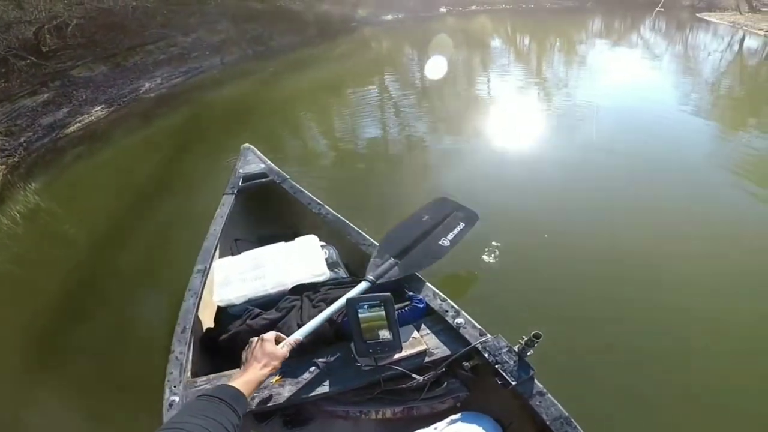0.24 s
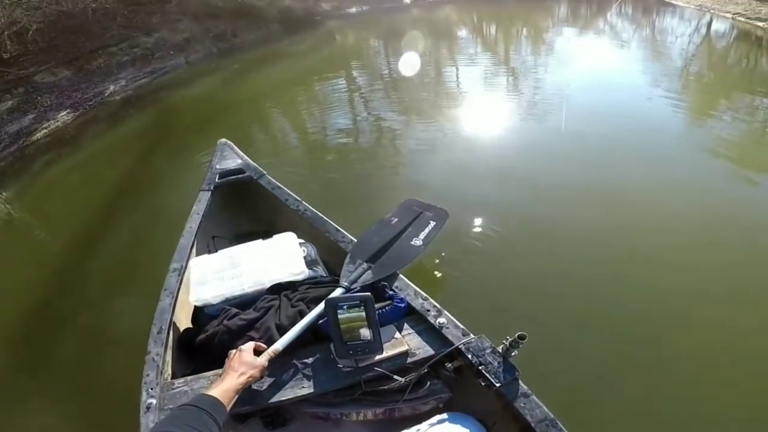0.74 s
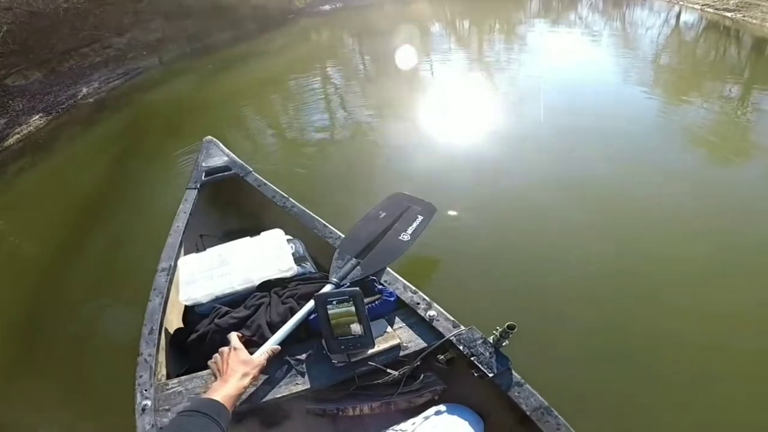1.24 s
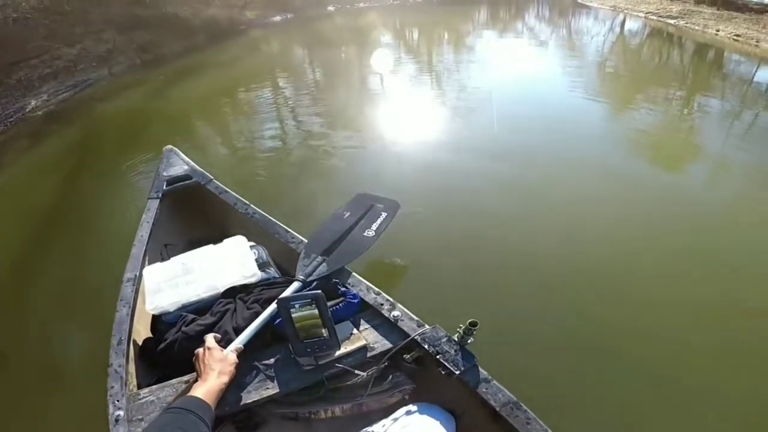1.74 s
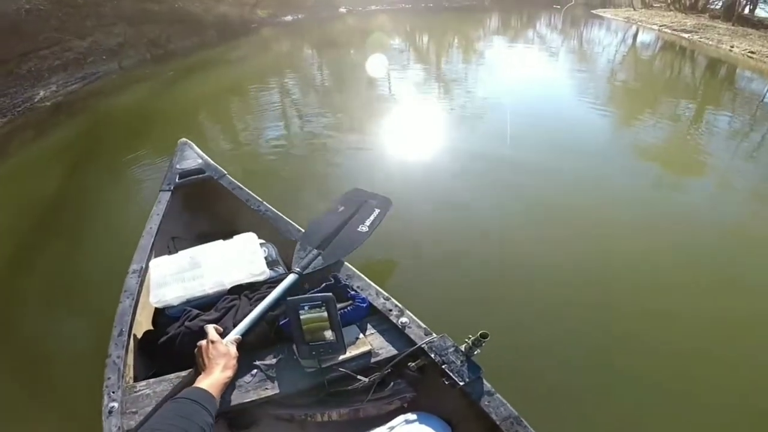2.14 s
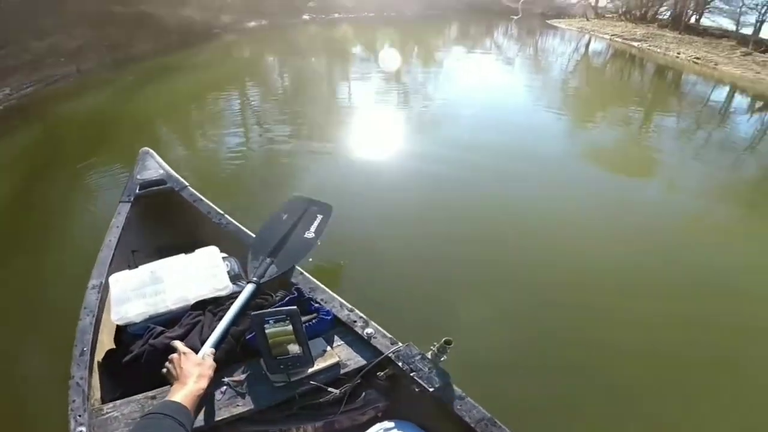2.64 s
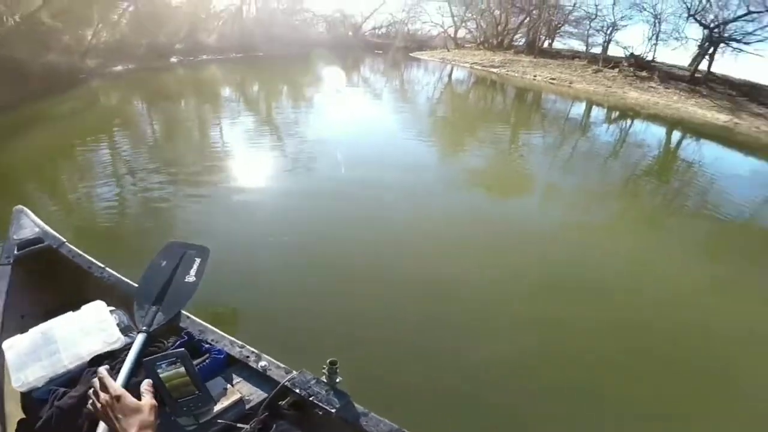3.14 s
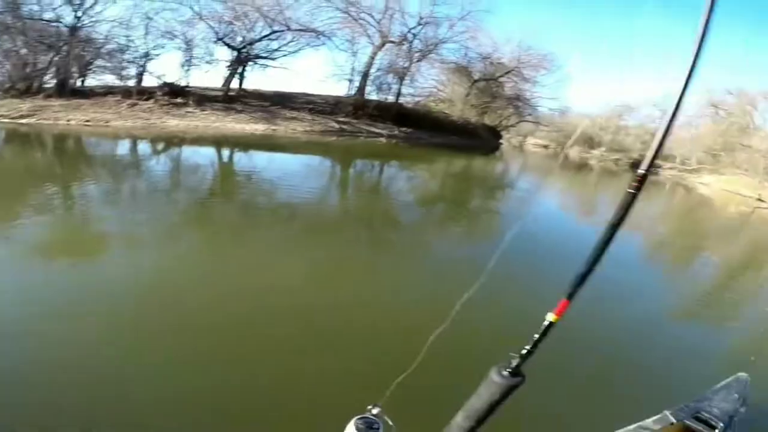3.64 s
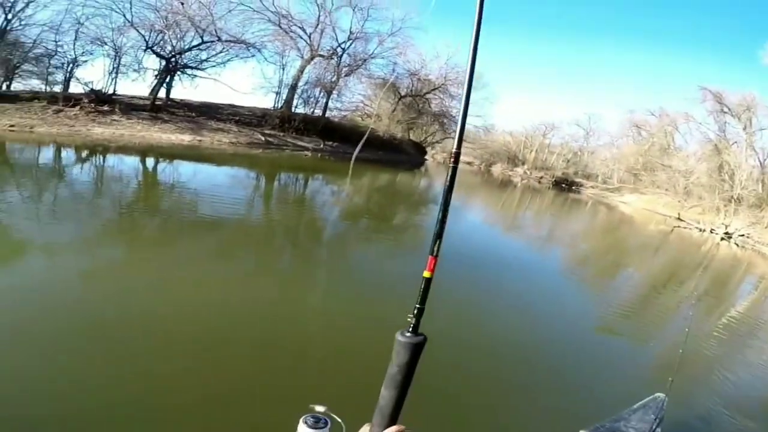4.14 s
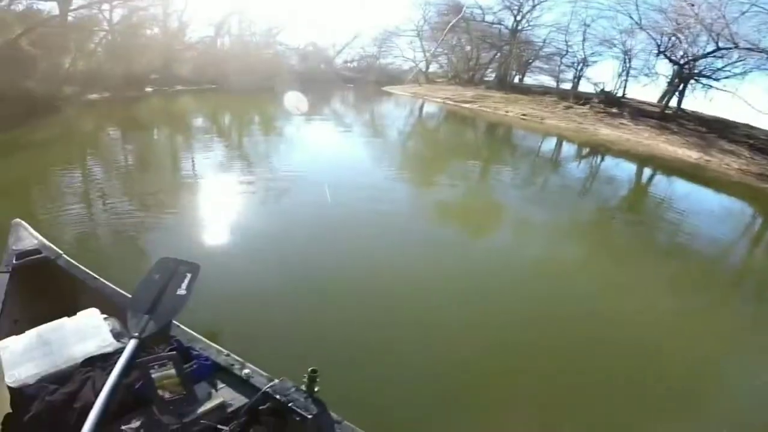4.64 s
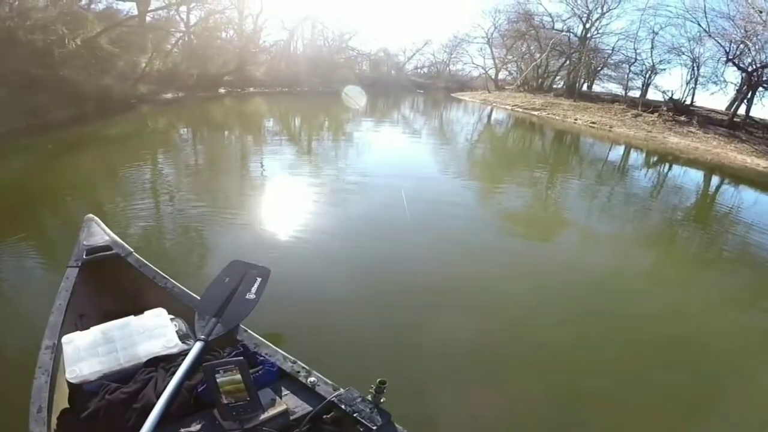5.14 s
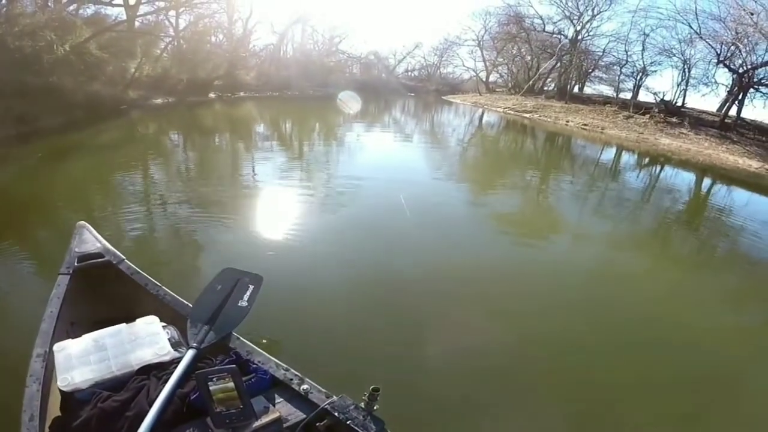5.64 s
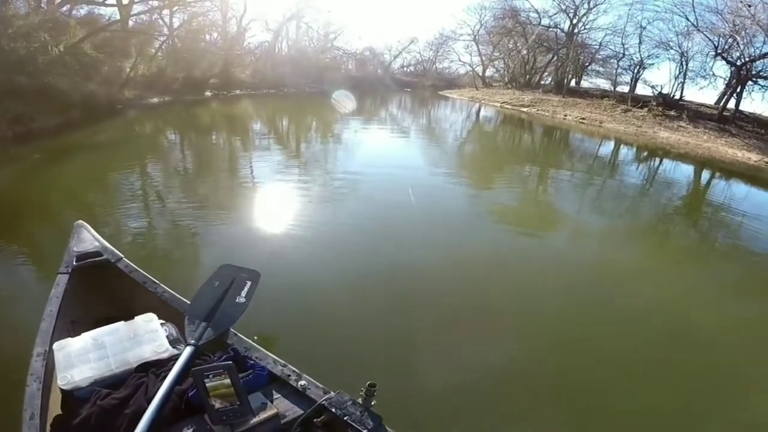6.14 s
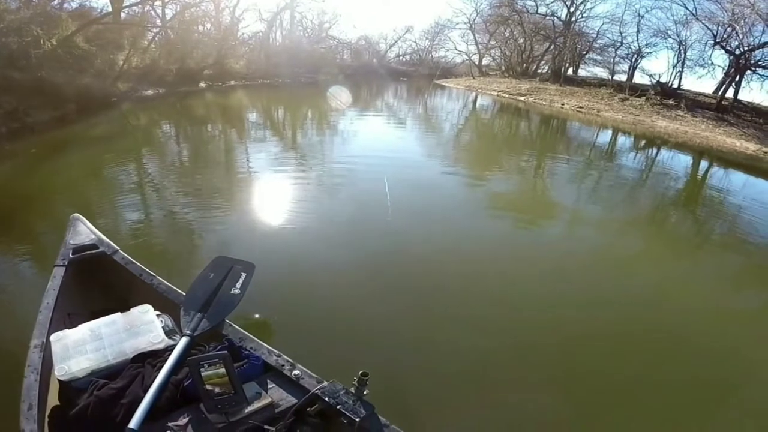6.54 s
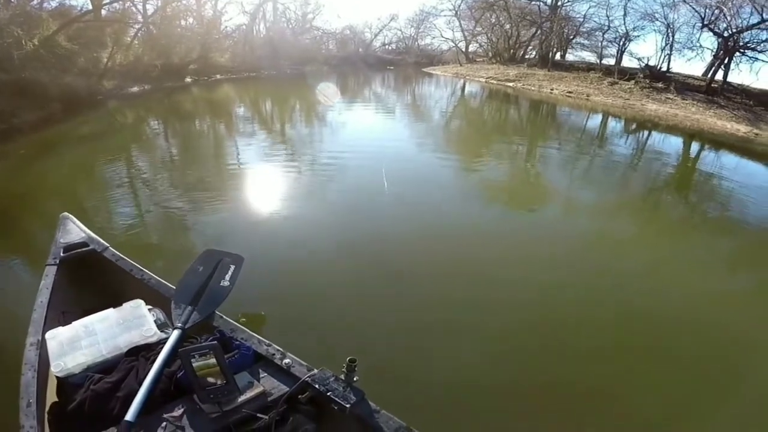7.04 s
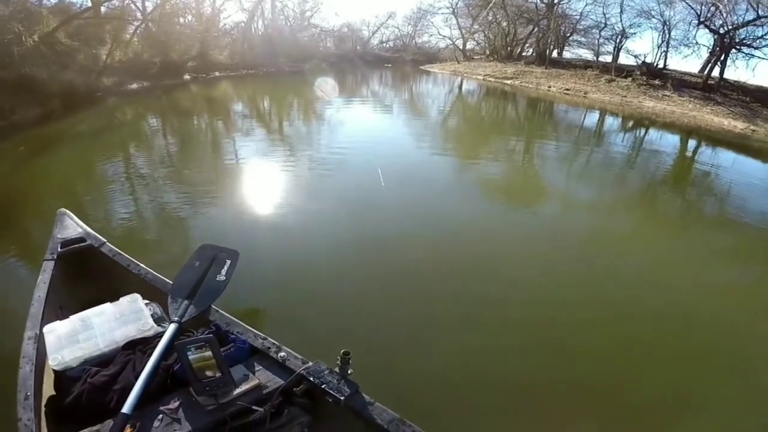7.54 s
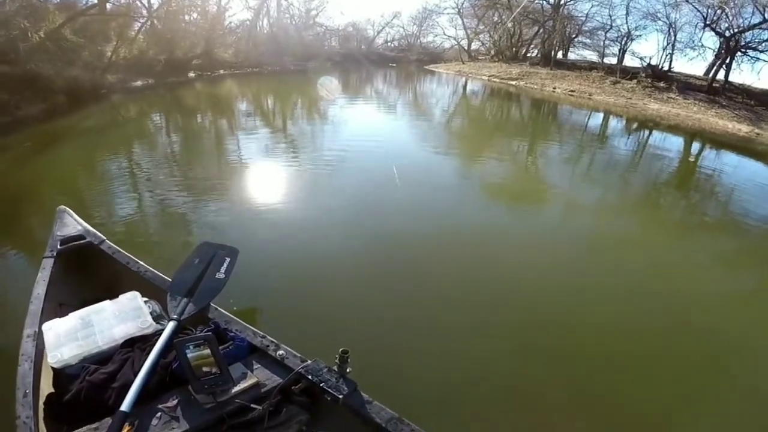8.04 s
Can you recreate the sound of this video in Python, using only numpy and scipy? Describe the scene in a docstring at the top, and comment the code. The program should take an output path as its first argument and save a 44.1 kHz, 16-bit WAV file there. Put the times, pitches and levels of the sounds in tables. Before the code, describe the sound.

A tiny wind puff opens on a calm creek: low breeze fading over seconds, steady faint hiss and the hollow hum of a canoe hull around 150 to 260 Hz. From 0.7 to 1.15 s a paddle knocks the hull, the strongest hit a woody clack at 1.06, with small drips at 0.83 and 0.94. A dull slide rubs at 1.65. At 2.2 a firm knock starts scraping and light taps; 2.75 to 2.9 is a tight, boomy, rattling clatter. Faint brush at 3.1, dry rod clicks at 3.77 and 3.95, then gentle rocking rumble, faint reel whirr and quick high squeaks from 4.25 to 4.48, with a muffled cloth bump left at 4.5. Weaker squeaks follow until 4.9, a drip at 5.4, soft whirrs at 6.4 and 7.9, sharp chirps at 6.68 and 8.2, a click at 6.96. Close, dry, faint bank echo.

```python
"""First come a soft breeze that dies away, a steady hiss and the low hum of a hollow canoe on a calm creek. A
paddle is laid across the gunwales: it knocks, slides, rattles and drips, a hand rubs along its shaft, and the
hull booms. Then a fishing rod is picked up: tackle clicks, the body bumps the hull, the reel whirrs and
squeaks, and clothing brushes a worn camera. Knocks ring the hull's modes; rubbing is many tiny noise grains;
squeaks are gliding tones; air is shaped noise."""
import sys
import numpy as np
from scipy import signal
from scipy.fft import rfft, irfft
from scipy.io import wavfile
from scipy.ndimage import uniform_filter1d

SR = 44100
rng = np.random.default_rng(int(sys.argv[2]) if len(sys.argv) > 2 else 0)


def pcm_store(signal):
    """Save signal as 16-bit PCM."""
    levels = np.round(np.clip(np.atleast_2d(signal), -1, 1) * 32767)
    wavfile.write(sys.argv[1], SR, levels.astype(np.int16).T)


N = 366030

# In these tables, likeness runs from -1 (left and right opposite) to 1 (left and right the same).

# distant air and hiss: pitch_hz, level_db
AIR_COLOUR = [(210, -22), (350, -5.5), (480, -4), (680, -5), (1270, -11), (2460, -21), (3600, -24.5),
              (5150, -27), (5600, -22.5), (6020, -17), (6600, -24.5), (10000, -25), (12700, -31),
              (14800, -39)]
# how alike the hiss is in the two ears: pitch_hz, likeness
AIR_LIKENESS = [(290, -0.36), (630, -0.84), (1390, -0.75), (3050, 0.23), (14000, -0.14)]
AIR_DB = -50
# low rumble of moving air: pitch_hz, level_db
BREEZE_COLOUR = [(15, 6.5), (35, -0.5), (60, -0.5), (100, -3.5), (200, -4.5), (500, -45.5)]
# the breeze dies away from its first level to almost still air
BREEZE_DB, BREEZE_FALL_DB_PER_S, STILL_DB = -43.5, 11, -75.5
# puffs of air on the microphone: start_s, length_s, level_db
PUFFS = [(0.0, 0.016, -37.5), (4.3, 0.23, -60)]
PUFF_ATTACK_S, PUFF_RELEASE_S = 0.013, 0.18

# narrow resonances of the hollow hull: pitch_hz, width_hz, level_db
HULL_HUM = [(144.7, 7.3, -5), (171.5, 11.9, 0.5), (198.1, 11.7, -2), (259.4, 7.3, -1), (317.8, 17, -13),
            (342.4, 13.8, -14)]
# broad murmur around those resonances: pitch_hz, level_db
HULL_COLOUR = [(90, -24.5), (115, -43), (142, -3.5), (172, 5), (205, -4), (228, -0.5), (260, -5.5),
               (310, -18), (450, -19.5), (800, -45)]
HUM_DB, MURMUR_DB = -48.5, -51.5
# shifting weight rocks the boat and stirs the hull: start_s, length_s, level_db
ROCKINGS = [(.9, 1.4, -46.5), (4.0, 0.53, -40.5), (7.8, 0.42, -45.5)]
ROCK_ATTACK_S, ROCK_RELEASE_S = 0.24, 0.37
# dull rumble of rocking and of brushing clothes: pitch_hz, level_db
ROCK_COLOUR = [(90, -25), (112, -24), (135, -2), (170, 12), (205, 2.5), (250, -1.5), (320, -10.5),
               (450, -24.5), (800, -48.5)]

# clothing brushes the camera: start_s, length_s, level_db
BRUSHES = [(4.44, 0.063, -41.5), (4.535, 0.047, -34)]
BRUSH_ATTACK_S, BRUSH_RELEASE_S, BRUSH_PAN_DB = 0.0088, 0.065, 10.5

# turns of the reel, with line running through the guides: start_s, length_s, level_db
REEL_TURNS = [(3.85, 1.0, -63), (4.2, 0.27, -57), (6.38, 0.41, -53), (7.9, 0.35, -54.5)]
REEL_ATTACK_S, REEL_RELEASE_S = 0.2, 0.43
# hiss of the running line: pitch_hz, level_db
LINE_COLOUR = [(700, -14), (1300, 1), (1700, -2.5), (2050, 4.5), (2450, -2.5), (2900, -1), (4200, -5),
               (6000, -1.5), (7300, -1), (9000, -8), (14000, -19)]
# resonances that the gear teeth tick into: pitch_hz, width_hz, level_db
GEARS = [(1680, 200, -3), (2000, 230, 0), (2330, 170, -10)]
LINE_DB, GEARS_DB = 1.2, -6  # their shares of the whirr

# squeaks: start_s, length_s, start_hz, middle_hz, end_hz, level_db, roughness (0 to 1),
# octave_db (against the main tone), phase_rad (left ahead of right)
SQUEAKS = [(3.881, 0.0039, 8150, 7960, 7600, -36, .4, -25, 2),
           (4.249, .011, 4350, 3780, 3950, -52, .4, -1, .9),
           (4.2606, 0.0077, 4430, 5100, 5200, -30, 0.3, -20, 0.95),
           (4.266, .01, 5100, 5500, 5650, -48, .5, -24, .9),
           (4.2775, .011, 5640, 5000, 4300, -27, 0.45, -20, 0.84),
           (4.29, 0.016, 5070, 4850, 4750, -50, .6, -20, 1.5),
           (4.352, 0.018, 4900, 5480, 5620, -33, 0.35, -22, 0.7),
           (4.369, 0.0053, 5700, 6050, 6360, -37, .3, -22, 0),
           (4.405, 0.032, 4660, 4720, 4960, -39, .35, -21, 0.3),
           (4.433, 0.016, 4950, 5150, 5450, -27.5, 0.25, -28, 0.6),
           (4.446, 0.021, 5560, 5720, 5600, -23.5, 0.25, -31, 1),
           (4.465, 0.012, 5400, 5240, 4900, -30.5, .5, -26, 1.5),
           (4.616, 0.029, 8200, 7100, 7650, -47, .25, -25, -1),
           (4.647, 0.014, 3560, 3500, 3370, -48, .35, 5, -1),
           (4.775, 0.033, 3880, 3840, 3450, -41.5, 0.5, 0, 1.78),
           (4.86, 0.025, 3640, 3780, 3870, -51.5, 0.35, 0, 1),
           (6.6755, 0.0127, 6250, 6680, 6950, -12, 0.2, -50, -2.65),
           (6.683, .005, 5300, 5000, 4700, -39, .9, -20, -1),
           (6.689, 0.005, 6750, 6900, 7000, -26, 0.7, -30, -2.3),
           (8.195, .005, 6400, 6500, 6800, -17.5, .2, -45, -2.6),
           (8.1998, 0.012, 6880, 7000, 7200, -12, 0.03, -55, -2.95)]

# light clicks of rod and tackle: start_s, level_db, decay_s (time to fall 60 dB), pitch_hz,
# tackle_db (ring of the other tackle), likeness
CLICKS = [(3.125, -49.5, .18, 7000, -1, .5), (3.766, -28, 0.016, 6400, 2, .5),
          (3.777, -46, 0.037, 4200, 6, .5), (3.951, -25.5, .011, 7000, -8.5, .75),
          (3.984, -43.5, .015, 6500, -3, .5), (4.657, -42.5, 0.022, 5200, 4, .5),
          (4.756, -42, 0.012, 8800, -6, 0.18), (5.996, -44, 0.12, 7300, -5, .5),
          (6.23, -49.5, 0.054, 1650, -12, .5), (6.957, -28, 0.011, 7650, -16, -0.76),
          (6.958, -38, 0.068, 1300, -13, -0.25)]
# what the other tackle rings with: pitch_hz, width_hz, level_db, likeness
TACKLE = [(850, 540, -3, -0.64), (2270, 340, 4, 0.47), (3560, 1060, 0, 0.67), (9500, 8100, -18, .3)]
CLICK_RISE = 0.042  # rise time as a share of decay_s: a long contact is a soft brush

# drips from the blade: start_s, impact_db, bubble_delay_s, bubble_hz, bubble_db
DRIPS = [(0.8348, -46, 0.00049, 2170, -39), (0.938, -60, .001, 3500, -55),
         (5.4168, -38.5, 0.0041, 2470, -49)]
IMPACT_T60_S, BUBBLE_T60_S = 0.0088, 0.034
BUBBLE_STRETCH_PER_S = 0.5  # the bubble's pitch climbs by twice this share of itself per second

# knocks and soft bumps on the hull: start_s, strength_db, hardness (0 soft, 1 hard),
# boom_db (extra where the hull gives), place (-1 rim, 1 wall), left_minus_right_db
KNOCKS = [(0.735, -29, 0.78, 4.5, -1.1, 2.5), (0.770, -31.5, 0.02, 3, -.6, 4),
          (0.843, -34, 0.7, 8.5, -0.77, 2.5), (0.885, -36, 0.62, 8, -1.17, 3),
          (1.0348, -38.5, 0.88, 5.5, -0.26, 1), (1.0561, -19, 0.57, -0.5, 0.38, 3.5),
          (1.057, -39.5, 1.3, -6, 0.0089, 0), (1.129, -37.5, 0.21, 11, 0.018, 3),
          (2.205, -26.5, 0.48, 3, 0.93, 4), (2.275, -49, 0.5, 9, 0.39, 2),
          (2.389, -39, 0.52, 6, -0.0089, 1), (2.412, -46, .55, 1, 0.005, 0),
          (2.478, -45, 0.54, 7.5, 0.76, 3), (2.526, -42, 0.46, 2, 0.48, 5), (2.57, -49, 0.72, -5, 0.1, 3),
          (2.756, -35.5, 0.5, 1, 0.5, 4), (2.7819, -38, 1.2, 8, -0.4, 1), (2.786, -39, 0.2, 10.5, -0.6, 5),
          (2.799, -40.5, 0.58, 15, -1.1, 4.5), (2.825, -37, 0.1, 10, -0.32, 4),
          (2.8567, -46.5, 0.9, 13, -0.56, 3), (2.869, -32, 0.26, 1, 0.3, 4), (2.911, -42, 0.2, 13, -.4, 4),
          (4.301, -46.5, 0.1, 9, .1, 0), (4.453, -43, 0, 10.5, 0.0016, 12),
          (4.512, -36.5, 0.1, 9.5, -0.75, 12.5), (6.958, -49, 0.65, -2, -0.11, 0)]
# what hull and paddle ring with: pitch_hz, level_db, decay_s (time to fall 60 dB),
# wall_db (added for a blow on the wall, taken away on the rim)
MODES = [(150.7, -8.5, 0.29, -1.5), (173.9, -3, 0.36, 4), (200, -3, 0.13, 0.5), (254, -2.5, 0.12, -6.5),
         (283, -20, 0.2, -10), (330, -8.5, 0.12, 10.5), (394, 3, 0.059, 4.5), (440, -7.5, 0.082, -3),
         (488, -10.5, 0.13, 8), (586, -9, 0.1, 0.5), (698, -1, 0.03, -1.5), (834, -3.5, 0.046, -3.5),
         (915, -12, 0.06, 6), (1030, -4.5, 0.047, 0.5), (1225, -1.5, 0.041, -1), (1340, -11.5, 0.046, -2),
         (1710, -4.5, 0.035, -2), (1787, -6, 0.049, 18), (1890, -5, 0.031, -3), (2240, -5, 0.029, -3),
         (2500, -2.5, 0.022, -8), (2700, -6, 0.045, -5), (2904, -3.5, 0.035, -1.5), (3330, -8, 0.061, -1),
         (3890, 3, 0.021, -4)]
SOFT_HZ, HARD_HZ = 193, 4850  # the softest and the hardest contact are 3 dB down at these pitches
CONTACT_ORDER, EDGE_DB = 6.06, -3  # steepness of the fall above that pitch; extra level of the top band
BANDS_HZ = (180, 450, 1800, 4200)  # hull boom, wall knock, shaft clack, edge tick

# the paddle shaft slides on the gunwale: start_s, length_s, level_db
SLIDES = [(1.655, 0.22, -41.5), (2.22, 0.09, -42.5), (2.385, 0.18, -43), (2.76, 0.16, -42)]
SLIDE_ATTACK_S, SLIDE_RELEASE_S = 0.024, 0.31
# tone of the sliding: pitch_hz, level_db
SLIDE_COLOUR = [(90, -41), (150, 8.5), (250, 9.5), (390, 4), (560, -12.5), (1000, -15), (2000, -28),
                (4000, -31), (9000, -48)]
SLIP_PER_S, SLIP_SPREAD_DB = 3000, 1.3  # tiny slips within a slide
# a hand or sleeve rubs along the paddle shaft: start_s, length_s, level_db
SCRAPES = [(2.27, 0.21, -59.5)]
SCRAPE_ATTACK_S, SCRAPE_RELEASE_S = 0.05, 0.35
# resonances of the blade: pitch_hz, width_hz, level_db
BLADE = [(1160, 430, -2), (1792, 200, 4.5), (2420, 170, 5.5), (3480, 150, 4), (4500, 900, -4),
         (7150, 1400, -7.5)]
# the loose paddle rattles as it settles: start_s, length_s, level_db
RATTLES = [(2.39, .19, -57), (2.756, 0.023, -41.5), (2.80, .09, -52)]
RATTLE_ATTACK_S, RATTLE_RELEASE_S, RATTLE_PER_S = 0.0033, 0.09, 350
# resonances of the loose shaft: pitch_hz, width_hz, level_db
SHAFT = [(600, 130, 0), (1220, 250, -15), (1850, 220, -15)]

TOP_HZ = 14500


def undb(db):
    """Turn decibels into gain."""
    return 10 ** (np.asarray(db) / 20)


def over_hz(hz, points):
    """Read (pitch_hz, value) points on a log-frequency axis."""
    f, value = np.transpose(points)
    return np.interp(np.log(hz + 1), np.log(f), value)


def unit(x):
    """Scale to an average (rms) level of 1."""
    return x / np.sqrt(np.mean(x ** 2))


def colour(x, points):
    """Shape a signal's spectrum by (pitch_hz, level_db) points, at rms 1."""
    gain = undb(over_hz(np.fft.rfftfreq(N, 1 / SR), points))
    return unit(irfft(rfft(x) * gain, N))


def pair(likeness, size=N):
    """Make left and right noise with the given likeness, by mixing a shared and an opposed part."""
    mid, side = rng.standard_normal((2, size))
    c = np.clip(likeness, -1, 1)
    return np.sqrt((1 + c) / 2) * mid + np.sqrt((1 - c) / 2) * np.array([side, -side])


def pan(db):
    """Left and right gains for a level difference, positive to the left."""
    return undb(np.array([[db], [-db]]) / 2)


def resonate(x, hz, width_hz):
    """Pass a signal through one resonance with gain 1 at its centre."""
    b, a = signal.iirpeak(min(hz, 0.45 * SR), hz / width_hz, SR)
    return signal.lfilter(b, a, x)


def body(x, resonances):
    """Ring (pitch_hz, width_hz, level_db) resonances with steep skirts, at rms 1."""
    return unit(sum(undb(db) * resonate(resonate(x, hz, width), hz, 3 * width)
                    for hz, width, db in resonances))


def fade(t, t60):
    """Decay smoothly by 60 dB in t60 seconds."""
    return np.exp(-np.log(1000) * t / t60)


def swells(rows, attack_s, release_s):
    """Gain curve for (start_s, length_s, level_db) moves: rise, hold, then fall 60 dB in release_s."""
    t = np.arange(N) / SR
    moves = []
    for start, length, db in rows:
        rise = np.clip((t - start) / attack_s, 0, 1)
        fall = fade(np.maximum(t - start - length, 0), release_s)
        moves.append(undb(db) * rise * fall)
    return np.linalg.norm(moves, axis=0)  # overlapping moves add in power


def grains(per_s, spread_db):
    """Tiny contacts at random moments; the wider the spread, the more a few stand out."""
    hits = rng.random(N) < per_s / SR
    return hits * undb(spread_db * np.minimum(rng.exponential(size=N), 4))


def add(out, start, x):
    """Mix a short stereo sound in at a time in seconds."""
    i = int(start * SR)
    out[:, i:i + x.shape[1]] += x[:, :N - i]


def outdoors():
    """Open air is a steady hiss of shaped noise, with a low breeze that dies away and puffs of air."""
    likeness = np.clip(over_hz(np.fft.rfftfreq(N, 1 / SR), AIR_LIKENESS), -0.95, 0.95)
    mid, side = rfft(rng.standard_normal((2, N)))
    hiss = irfft(mid * np.sqrt(1 + likeness) + np.array([side, -side]) * np.sqrt(1 - likeness), N)
    dying_db = BREEZE_DB - BREEZE_FALL_DB_PER_S * np.arange(N) / SR
    breeze = np.hypot(undb(dying_db), undb(STILL_DB))
    wind = breeze + swells(PUFFS, PUFF_ATTACK_S, PUFF_RELEASE_S)
    return undb(AIR_DB) * colour(hiss, AIR_COLOUR) + colour(pair(0.63), BREEZE_COLOUR) * wind


def hull():
    """The hollow hull hums on its resonances all the time, and rumbles while the boat rocks."""
    hum = undb(HUM_DB) * body(pair(0.45), HULL_HUM)
    murmur = undb(MURMUR_DB) * colour(pair(0.63), HULL_COLOUR)
    rocking = colour(pair(0.6), ROCK_COLOUR) * swells(ROCKINGS, ROCK_ATTACK_S, ROCK_RELEASE_S)
    return (hum + murmur + rocking) * pan(2.25)


def handling():
    """Clothing rubs the left side of the camera, heard as a dull rumble that stops short."""
    brushing = swells(BRUSHES, BRUSH_ATTACK_S, BRUSH_RELEASE_S)
    return colour(pair(0.51), ROCK_COLOUR) * brushing * pan(BRUSH_PAN_DB)


def reel():
    """Gears and running line make a soft grainy whirr, fluttering with the uneven turn of the handle."""
    flutter_db = 0.7 * unit(uniform_filter1d(rng.standard_normal(N), size=1200))
    turning = swells(REEL_TURNS, REEL_ATTACK_S, REEL_RELEASE_S) * undb(flutter_db)
    line = colour(pair(0.071) * grains(per_s=6000, spread_db=0.5), LINE_COLOUR)
    # each gear resonance gets its own ticks
    gears = unit(sum(undb(db) * body(pair(0.25) * grains(per_s=500, spread_db=1.7), [(hz, width, 0)])
                     for hz, width, db in GEARS))
    return (undb(LINE_DB) * line + undb(GEARS_DB) * gears) * turning


def squeaks(waver=0.042, flutter=0.55, rasp_db=-19, swell=0.46, ring_s=0.00051, octave_flicker=0.85):
    """Rubbing parts stick and slip fast enough to sing: short glides with a flickering octave."""
    out = np.zeros((2, N))
    keep = np.exp(-1 / (ring_s * SR))
    for s, length, start, middle, end, db, rough, octave_db, lead in SQUEAKS:
        # progress through the squeak, held at 1 for the last 10 ms
        u = np.minimum(np.arange(int(length * SR) + SR // 100) / (length * SR), 1)
        drift, grip, edge = (unit(v) for v in uniform_filter1d(rng.standard_normal((3, len(u))), size=70))
        # a smooth curve through the three pitches, less steady when rough
        glide = np.polyval(np.polyfit([0, 0.5, 1], [start, middle, end], 2), u)
        hz = glide * (1 + rough * waver * drift)
        phase = 2 * np.pi * np.cumsum(hz) / SR + np.array([[lead], [-lead]]) / 2
        octave = np.sin(2 * phase + octave_flicker * grip) * (1 + octave_flicker * edge)
        tone = np.sin(phase) + undb(octave_db) * octave
        rasp = rough ** 2 * undb(rasp_db) * unit(resonate(pair(0, len(u)), middle, 3000))
        pressure = np.abs(np.sin(np.pi * u)) ** swell * np.exp(rough * flutter * grip)
        # the part takes a moment to start singing, and rings on when the rubbing stops
        loudness = signal.lfilter([1 - keep], [1, -keep], pressure)
        add(out, s, undb(db) * loudness * (tone + rasp))
    return out


def clicks():
    """Small hard parts of the rod and reel tap each other: fading noise through resonances."""
    out, t = np.zeros((2, N)), np.arange(SR // 8) / SR
    for s, db, t60, hz, tackle_db, likeness in CLICKS:
        tackle = sum(undb(g) * resonate(resonate(pair(c, len(t)), f, w), f, 2 * w) for f, w, g, c in TACKLE)
        part = resonate(resonate(pair(likeness, len(t)), hz, 2000), hz, 2200)
        ring = unit(part + undb(tackle_db) * tackle)
        rise = 1 - np.exp(-t / (CLICK_RISE * t60))
        add(out, s, undb(db) * ring * fade(t, t60) * rise)
    return out


def drips(impact_hz=4400, impact_width_hz=2600):
    """A drop ticks on the surface, then the bubble it traps rings and rises a little in pitch."""
    out, t = np.zeros((2, N)), np.arange(SR // 8) / SR
    for s, impact_db, delay, hz, db in DRIPS:
        splash = resonate(pair(0.49, len(t)), impact_hz, impact_width_hz)
        tick = unit(resonate(splash, impact_hz, impact_width_hz))
        add(out, s, undb(impact_db) * tick * fade(t, IMPACT_T60_S))
        bubble = np.sin(2 * np.pi * hz * t * (1 + BUBBLE_STRETCH_PER_S * t)) * fade(t, BUBBLE_T60_S)
        add(out, s + delay, undb(db) * bubble * pan(-1.5))
    return out


def contact(db, hardness, boom_db):
    """Levels in the four bands of a blow: a harder contact is shorter and reaches higher."""
    reach_hz = SOFT_HZ * (HARD_HZ / SOFT_HZ) ** hardness
    fall = 10 * np.log10(1 + (np.array(BANDS_HZ) / reach_hz) ** CONTACT_ORDER)
    return db - fall + np.array([boom_db, 0, 0, EDGE_DB])


def crack(t, wall_db, clack_db, tick_db, wall_t60=0.082, clack_t60=0.065, tick_t60=0.035,
          contact_s=0.00013, flex_s=0.0013, soft_hz=2200):
    """Countless high modes merge into a short burst of noise that builds up during the contact."""
    # the wall flexes and the round shaft gives a dull clack; only a hard edge adds the tick above them
    low_pass = signal.butter(4, soft_hz, fs=SR, output="sos")
    dull = signal.sosfilt(low_pass, pair(1.0, len(t)))
    flex = 1 - np.exp(-t / flex_s)
    # the fixed decibels balance each burst against the ringing modes
    wall = undb(wall_db - 11.5) * body(pair(0.18, len(t)), [(900, 410, 0)]) * flex
    clack = undb(clack_db - 5.5) * unit(resonate(resonate(dull, 1500, 2200), 1550, 2400))
    tick = undb(tick_db + 4.0) * unit(resonate(resonate(pair(0.5, len(t)), 3100, 2700), 5200, 4000))
    burst = wall * fade(t, wall_t60) + clack * fade(t, clack_t60) + tick * fade(t, tick_t60)
    return burst * (1 - np.exp(-t / contact_s))


def blow(strengths, place, scatter_db=1, spread_hz=1000, wall_calm=0.49, rise_cycles=1.0, lag_rad=1.464):
    """One blow rings the modes; where and how hard it lands decides their shares."""
    t = np.arange(SR // 2) / SR
    shares = list(zip(BANDS_HZ, strengths))
    out = 0
    for k, (hz, db, t60, wall_db) in enumerate(MODES):
        size, tune, left, right = rng.standard_normal(4)
        # long waves reach both microphone ports in step, short ones do not,
        # unless the broad wall sends them
        spread = min(hz / spread_hz, 1.3) ** 2 * (1 - wall_calm * max(place, 0))
        ports = np.array([[left], [right]]) * spread
        # the paddle's weight retunes the upper modes a little at each contact
        detune = 0.014 * min(hz / 400, 1) ** 2 * tune
        swell = 1 - np.exp(-t * hz / rise_cycles)
        # each mode lags the one below, so the boom arrives just after the clack, as bending waves do
        wave = np.sin(2 * np.pi * hz * (1 + detune) * t + ports - k * lag_rad)
        level_db = db + place * wall_db + over_hz(hz, shares) + scatter_db * size
        out = out + undb(level_db) * wave * swell * fade(t, t60)
    return out + crack(t, *strengths[1:])


def knocks():
    """The paddle strikes the gunwale and hull, and a few soft bumps of the body knock the hull; each blow rings
    the boat."""
    out = np.zeros((2, N))
    for s, db, hardness, boom_db, place, pan_db in KNOCKS:
        add(out, s, blow(contact(db, hardness, boom_db), place) * pan(pan_db))
    return out


def slide():
    """The shaft rubs along the gunwale in dense tiny slips, under a wavering grip."""
    slips = grains(per_s=SLIP_PER_S, spread_db=SLIP_SPREAD_DB)
    grip = undb(0.98 * unit(uniform_filter1d(rng.standard_normal(N), size=700)))
    rub = colour(slips * grip * pair(0.93), SLIDE_COLOUR)
    return rub * swells(SLIDES, SLIDE_ATTACK_S, SLIDE_RELEASE_S)


def scrape():
    """A hand or sleeve rubs along the paddle shaft, and tiny contacts ring its resonances."""
    ring = body(pair(0.41) * grains(per_s=670, spread_db=0.0), BLADE)
    return ring * swells(SCRAPES, SCRAPE_ATTACK_S, SCRAPE_RELEASE_S)


def rattle():
    """The loose shaft chatters as it settles, in sparser and less even contacts."""
    ring = body(pair(0.4) * grains(per_s=RATTLE_PER_S, spread_db=4.0), SHAFT)
    return ring * swells(RATTLES, RATTLE_ATTACK_S, RATTLE_RELEASE_S)


def paddle():
    """The paddle knocks, slides and rattles on the boat, with a few soft body bumps among the knocks, and a
    hand rubs along its shaft; the rubbing sits a little to the left."""
    return knocks() + (slide() + scrape() + rattle()) * pan(2.5)


def reflections(x, near_db=-22, near_t60=0.14, far_db=-31, far_t60=0.79):
    """Add quick scatter from the boat and a faint return from the banks, as fading noise echoes."""
    t = np.arange(SR // 2) / SR
    near = undb(near_db) * unit(pair(0, len(t)) * fade(t, near_t60))
    far = undb(far_db) * unit(pair(0, len(t)) * fade(t, far_t60))
    tail = (near + far) / np.sqrt(len(t))
    return x + signal.fftconvolve(x, tail, axes=1)[:, :N]


def scene():
    """Paddle and tackle sound close by, over the hull and the open air."""
    background = outdoors() + hull() + handling() + reel()
    close = squeaks() + clicks() + drips() + paddle()
    return background + reflections(close)


def record(dry):
    """The camera cuts the pitches above TOP_HZ with a steep low-pass filter."""
    return signal.sosfilt(signal.ellip(8, 0.2, 70, TOP_HZ, fs=SR, output="sos"), dry)


dry = scene()
out = record(dry)
pcm_store(out)
```